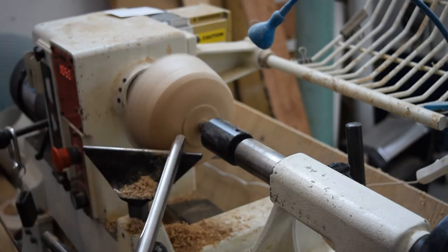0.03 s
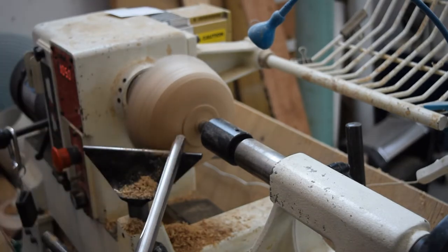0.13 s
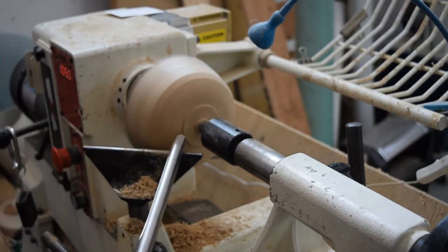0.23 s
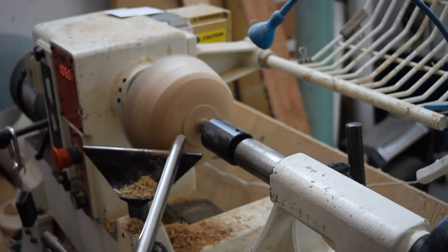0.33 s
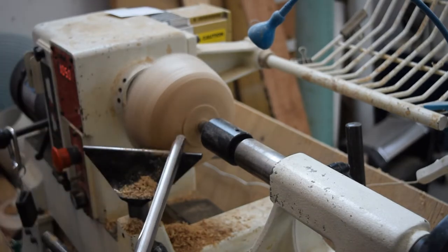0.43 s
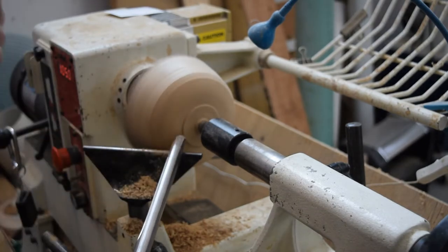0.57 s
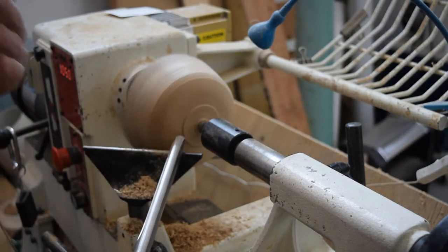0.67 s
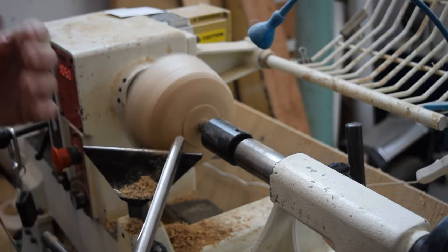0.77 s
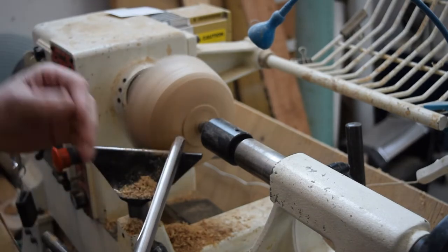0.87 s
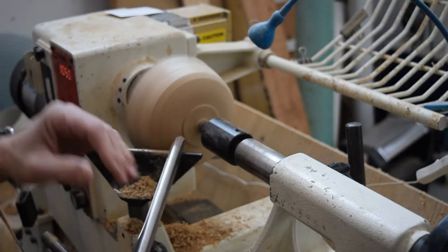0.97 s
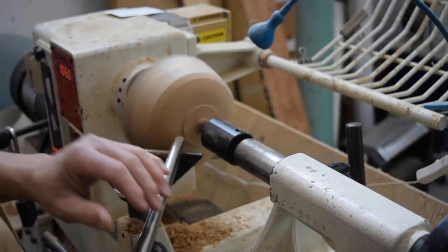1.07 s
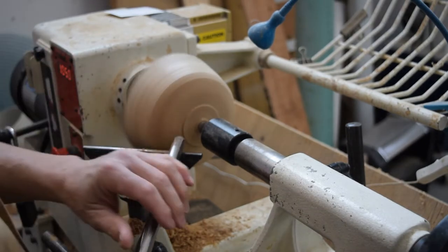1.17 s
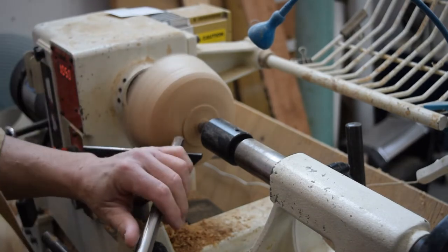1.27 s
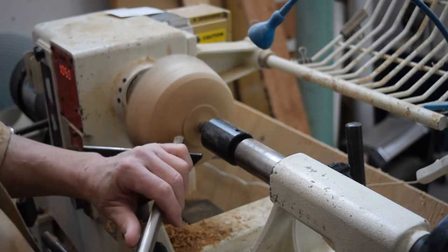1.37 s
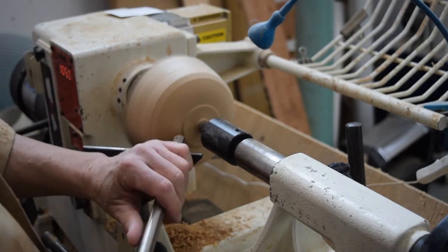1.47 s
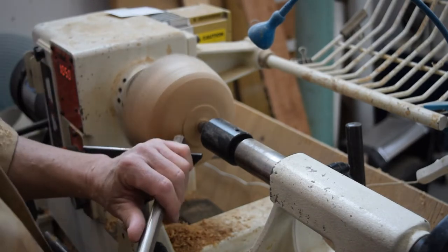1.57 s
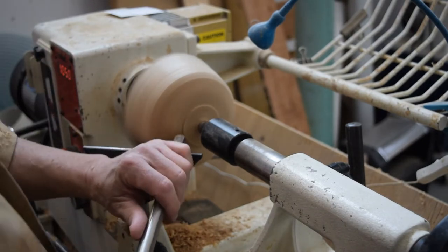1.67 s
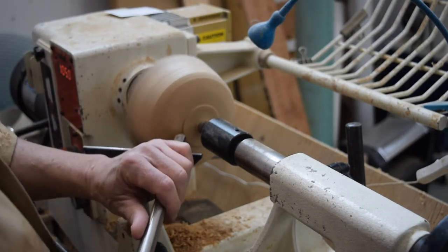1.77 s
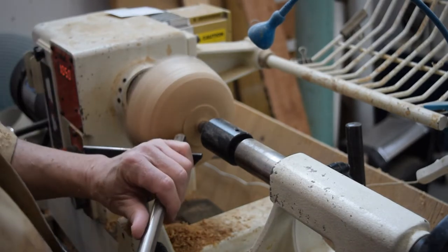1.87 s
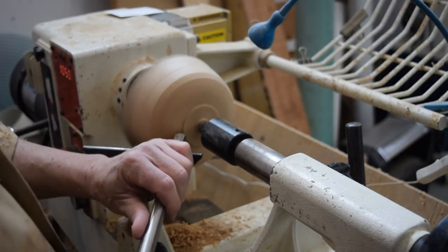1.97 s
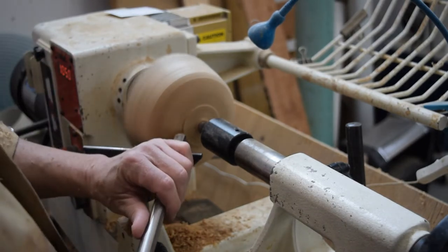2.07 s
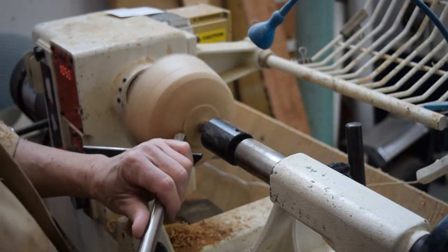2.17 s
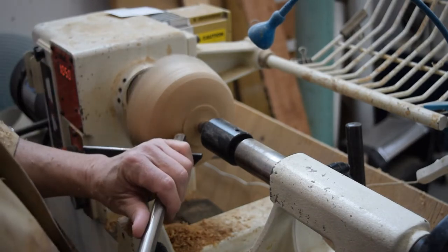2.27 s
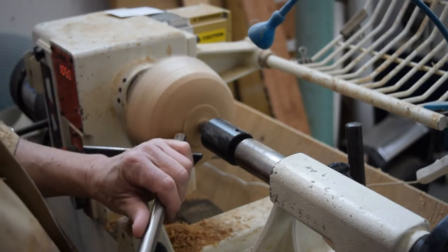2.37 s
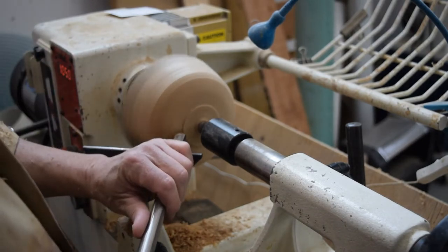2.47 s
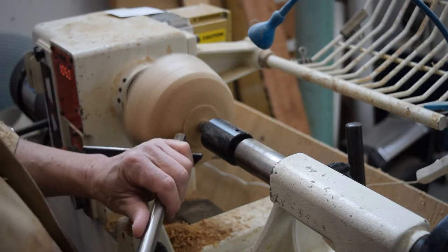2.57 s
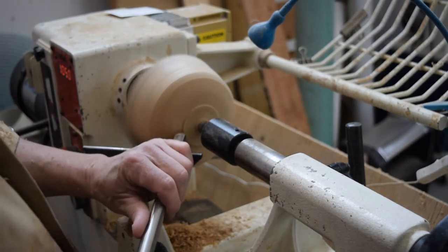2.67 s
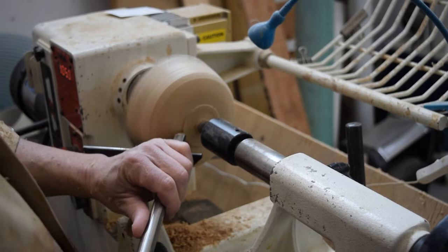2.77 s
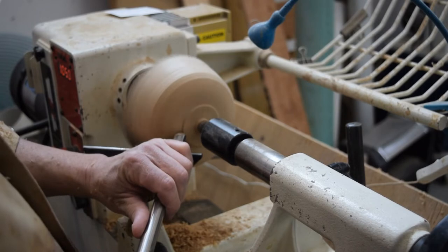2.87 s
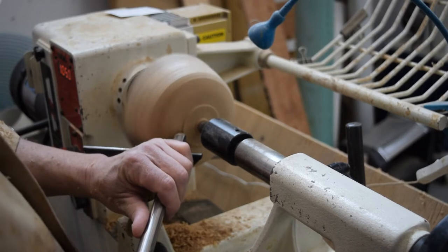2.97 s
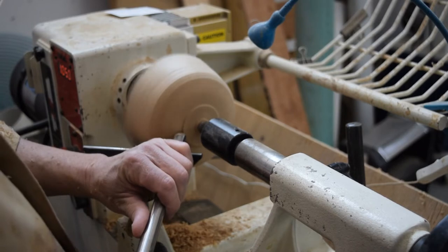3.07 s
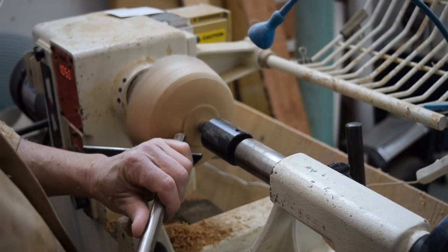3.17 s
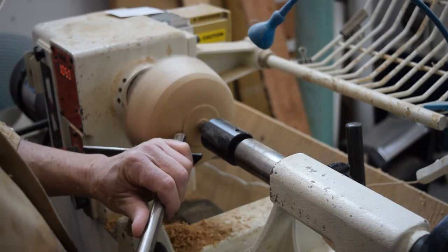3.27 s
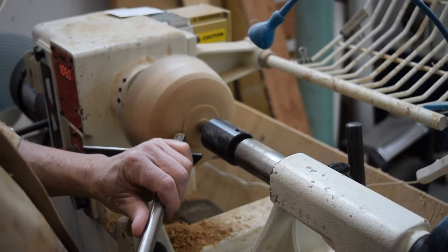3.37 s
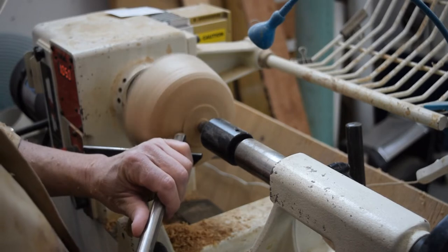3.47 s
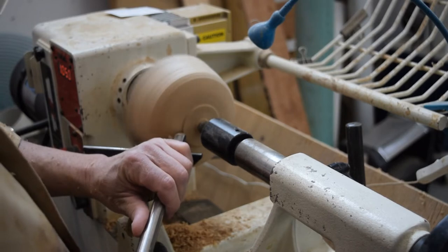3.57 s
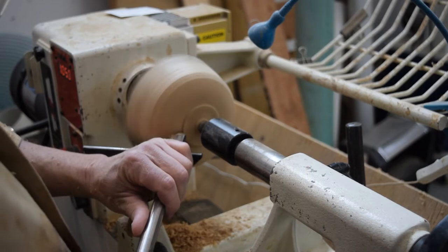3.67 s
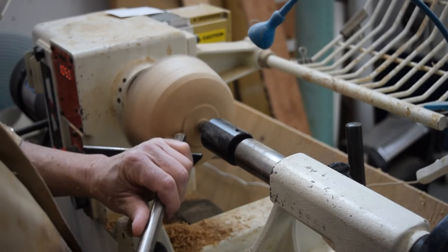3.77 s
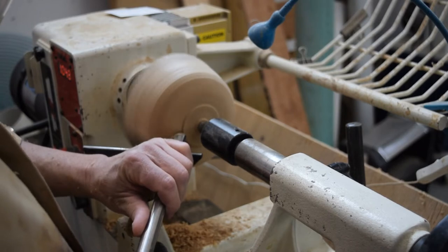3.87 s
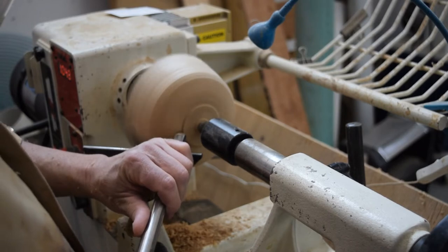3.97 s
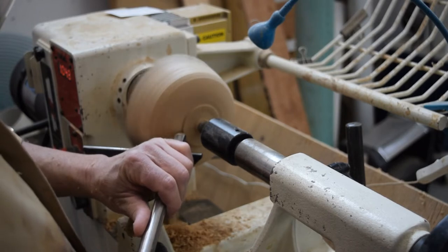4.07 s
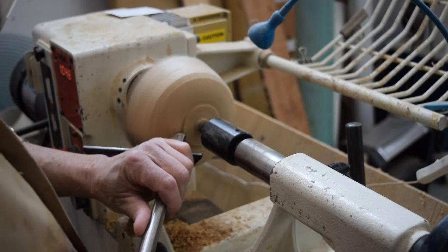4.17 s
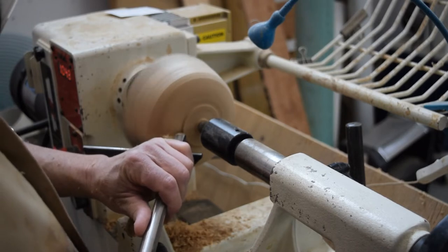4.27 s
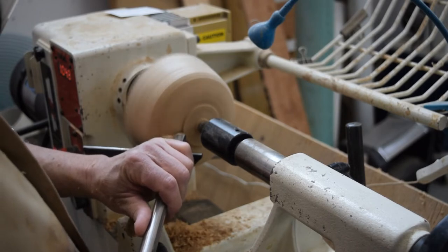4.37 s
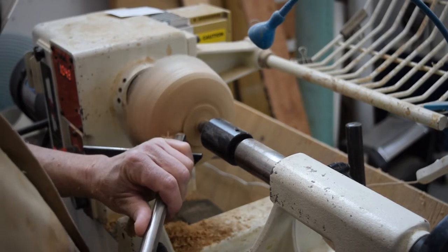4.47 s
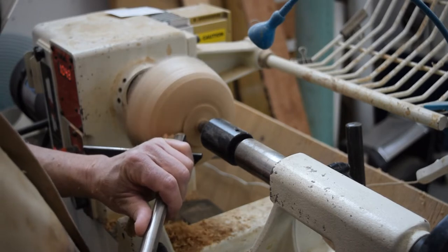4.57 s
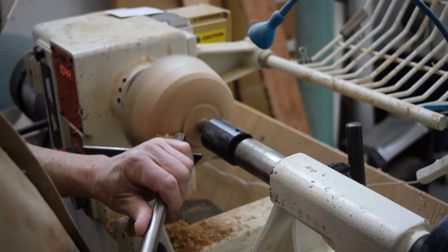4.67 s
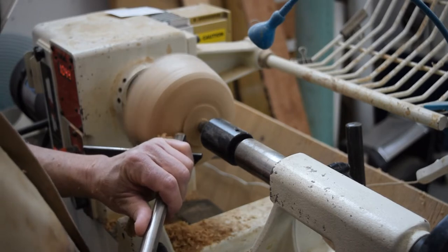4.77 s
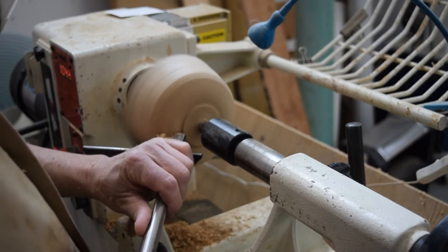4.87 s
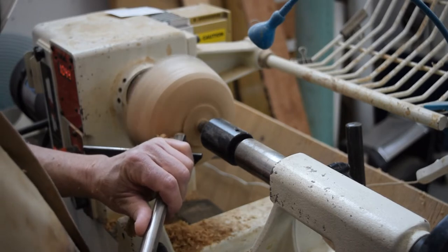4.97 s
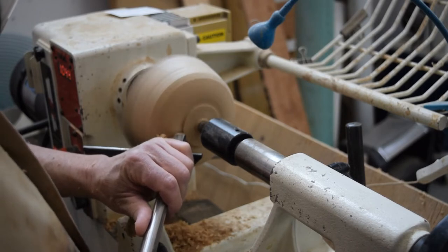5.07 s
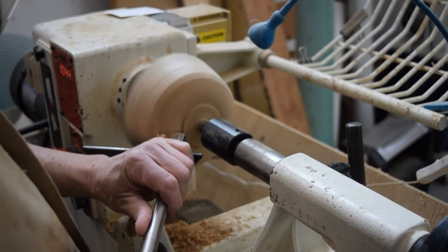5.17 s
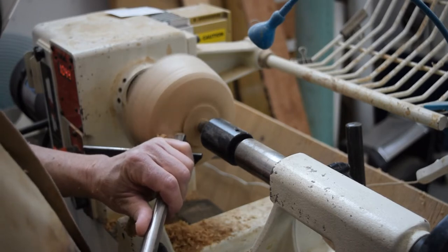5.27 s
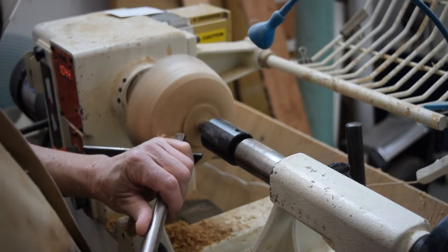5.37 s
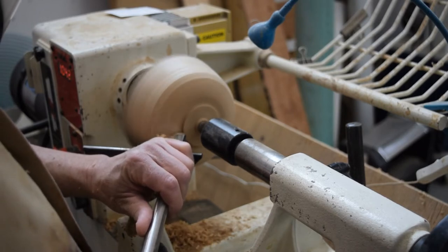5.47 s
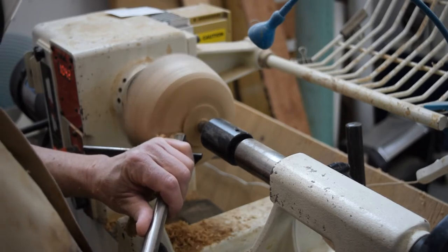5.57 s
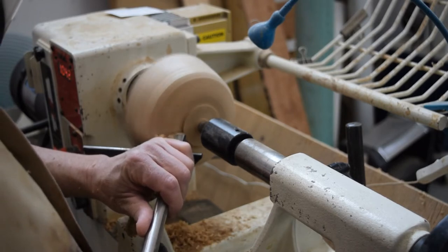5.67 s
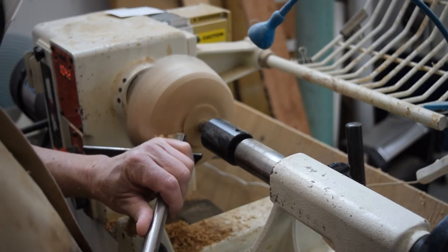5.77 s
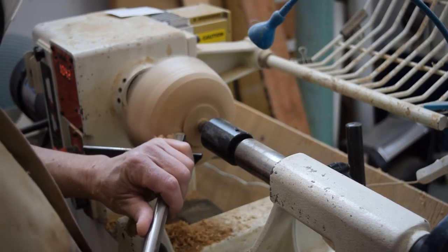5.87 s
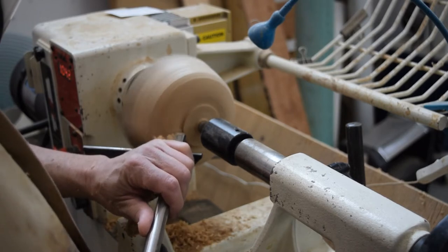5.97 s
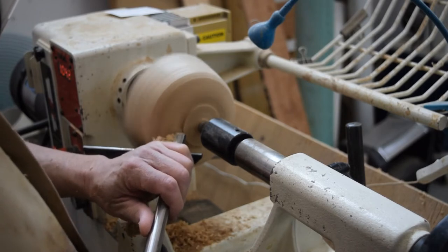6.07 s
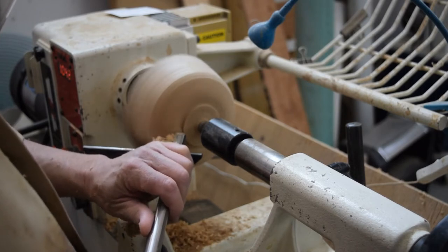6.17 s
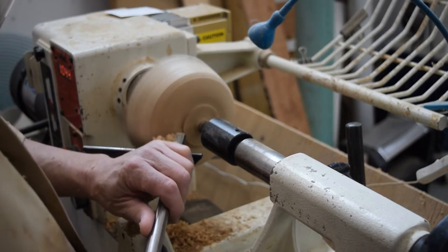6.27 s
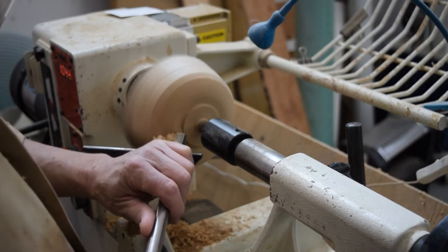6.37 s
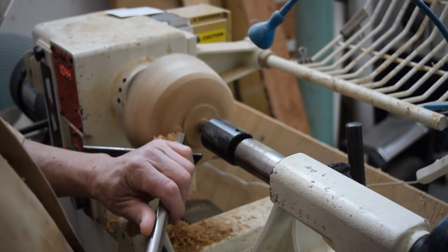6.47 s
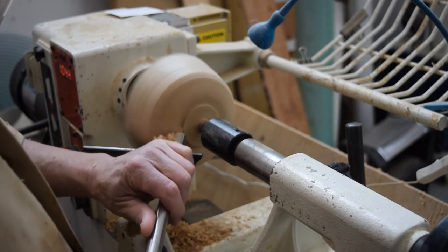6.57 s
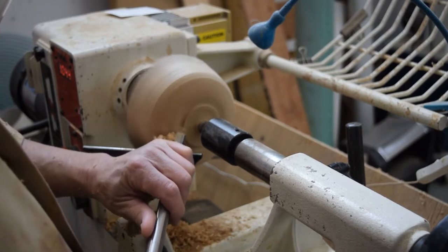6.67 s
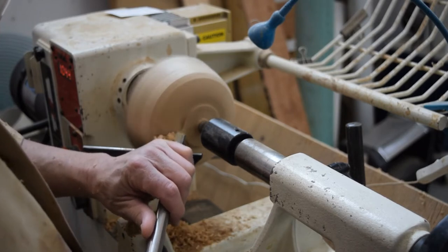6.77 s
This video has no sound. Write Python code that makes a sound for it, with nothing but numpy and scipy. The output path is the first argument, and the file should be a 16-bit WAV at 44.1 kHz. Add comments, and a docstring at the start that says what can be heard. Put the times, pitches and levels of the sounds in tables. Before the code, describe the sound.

A wood lathe hums with a thin high whistle, then a gouge bites the spinning bowl with a loud, rough, rapidly pulsing scrape.

```python
"""In a workshop a wood lathe idles: motor orders hum over belt and fan noise and a thin inverter whistle.
A gouge then meets the spinning dry bowl. Its edge rides nearly the same ridges on every turn and bites
hardest on two end-grain faces; that relief drives filters for the bed, the bowl and the steel.
Spindle orders thrum, chatter and narrow modes ring, shavings hiss, and short reflections surround it."""
import sys
import numpy as np
from scipy import signal
from scipy.fft import irfft, next_fast_len
from scipy.io import wavfile
from scipy.ndimage import uniform_filter1d

SR = 44100
rng = np.random.default_rng(int(sys.argv[2]) if len(sys.argv) > 2 else 0)


def generate_wav(sig):
    """Save sig (samples, or channels by samples) to the path in sys.argv[1] as 16-bit PCM at SR."""
    pcm = np.round(np.clip(np.atleast_2d(sig).T, -1, 1) * 32767).astype(np.int16)
    wavfile.write(sys.argv[1], SR, pcm)


N = 300762
T = np.arange(N) / SR  # s


def amp(db):
    """Amplitude factor of a level in dB."""
    return 10 ** (np.asarray(db) / 20)


def evened(x):
    """Scale to rms 1."""
    return x / np.sqrt(np.mean(x ** 2) + 1e-20)


def read(points, hz):
    """Interpolate a (Hz, value) table on a log frequency axis."""
    f, value = np.transpose(points)
    return np.interp(np.log(hz + 1), np.log(f + 1), value)


def columns(rows):
    """One curve over time for each column after the seconds."""
    s, *values = np.transpose(rows)
    return [np.interp(T, s, v) for v in values]


def colour(x, gain):
    """Causal minimum-phase filter whose magnitude is the function gain(hz)."""
    log_gain = np.log(gain(abs(np.fft.fftfreq(8192, 1 / SR))) + 1e-5)
    spectrum = np.exp(np.conj(signal.hilbert(log_gain)))
    taps = np.fft.ifft(spectrum).real[:4096]
    return signal.oaconvolve(x, taps)[:N]


def resonate(x, hz, width_hz):
    """A resonance of gain 1 that follows the curve hz: shift to 0 Hz, smooth, shift back."""
    turn = np.exp(2j * np.pi * np.cumsum(hz) / SR)
    r = np.exp(-np.pi * width_hz / SR)
    return 2 * (turn * signal.lfilter([1 - r], [1, -r], x / turn)).real


def tone(cycles, db, start=None):
    """Sine of rms level db; its start phase is random unless given in cycles."""
    start = rng.random() if start is None else start
    return np.sqrt(2) * amp(db) * np.sin(2 * np.pi * (cycles + start))


def waver(rate_hz):
    """Slow random drift of rms 1, from 12 sines between 1 Hz and rate_hz."""
    t = T[::200]
    slow = sum(np.sin(2 * np.pi * (f * t + rng.random())) / np.sqrt(f) for f in np.geomspace(1, rate_hz, 12))
    return np.interp(T, t, evened(slow))


def relief(turns, likeness, per_turn_hz, depth):
    """White roughness laid round a circle; a deeper shaving renews more of it on each turn."""
    size = 6000  # points a turn
    count = int(turns[-1]) + 2
    like = np.clip(likeness(np.arange(size // 6) * per_turn_hz), .01, .995)
    z = rng.standard_normal((count, size // 6, 2)) @ [1, 1j]  # one spectrum for each turn
    for k in range(1, count):
        keep = like ** np.interp(k, turns, depth)
        z[k] = keep * z[k - 1] + np.sqrt(1 - keep ** 2) * z[k]
    surface = irfft(z, size).ravel()
    return evened(np.interp(turns * size, np.arange(count * size), surface))


# Reflected share. Each row: frequency in Hz, level in dB.
WALLS_DB = [(100, -39), (300, -10), (600, -7.5), (1200, -13.5), (2500, -11.5), (5000, -20), (8000, -3.5),
            (11000, -10), (14000, -5)]
COMMON_REMOVED = .85  # share (0-1) of the reflections common to both channels that is taken out


def workshop(x):
    """Short sparse reflections, drawn separately for each channel, decaying 60 dB in 0.29 s."""
    at = np.arange(100, 9000, 20) + rng.integers(0, 20, (2, 445))
    taps = np.zeros((2, 9100))
    np.put_along_axis(taps, at, rng.choice([-1., 1.], at.shape) * amp(-60 * at / SR / 0.29), 1)
    taps -= COMMON_REMOVED * taps.mean(0)
    wet = colour(x, lambda hz: amp(read(WALLS_DB, hz)))
    return signal.oaconvolve(wet[None], taps / np.linalg.norm(taps[0]), axes=1)[:, :N]


# Whistle sidebands. Each row: multiple of the output frequency off the switching rate, level in dB,
# left minus right in dB.
SIDEBANDS = [(-29, -76, 0), (-23, -71, 0), (-17, -71, 0), (-15, -75, 0), (-11, -75, 0), (-9, -65, 3),
             (-5, -60, 9), (-3, -68, 0), (-1, -51.5, -5), (1, -55.5, -5), (3, -59, 10), (5, -62, 9),
             (11, -73, 0), (17, -74, 0), (23, -65.5, -2)]
SWITCH_HZ, DRIVE_HZ = 10000.7, 42.22  # switching rate, output frequency


def inverter():
    """Sidebands of the switching rate at multiples of the output frequency, some leaning to one side."""
    whistle = 0
    for k, db, lean_db in SIDEBANDS:
        sides = amp([[lean_db / 2], [-lean_db / 2]])
        whistle = whistle + sides * tone((SWITCH_HZ + k * DRIVE_HZ) * T, db + 0.5 * waver(7.2))
    return whistle


# Motor shaft speed. Each row: time in seconds, turns a second.
MOTOR_TURNS_PER_S = [(0, 21.095), (2.3, 21.095), (2.8, 21.06), (3.7, 21.05), (4.1, 21.02), (5.7, 21.02),
                     (5.95, 21.07), (6.82, 21.07)]
# Order 48, the slot whine, swells with load. Each row: time in seconds, level in dB before the jolts.
WHINE_DB = [(0, -37), (2.37, -42.5), (2.53, -38), (2.9, -32), (3.61, -31), (3.78, -39), (4.2, -30),
            (4.55, -42), (5.3, -32), (5.5, -36), (5.87, -31), (6.36, -38), (6.63, -31.5), (6.82, -33)]
# Other strong orders. Each row: multiple of the shaft speed, level in dB before the load swell.
ORDERS_DB = [(33, -62), (35, -45.5), (37, -55), (38, -55), (40, -56.5), (44, -57), (51, -57), (52, -61),
             (60, -56), (62, -57), (66, -58), (71, -58), (74, -43)]
# Faint tones, likely bearings and fan. Each row: frequency in Hz, mean level in dB.
BEARINGS_DB = [(1970, -64), (2067, -64), (2207, -67), (2304, -60), (2460, -66), (2643, -66), (2955, -78),
               (3052, -62), (3435, -72), (4856, -75), (5464, -73), (5970, -74)]
# Spectrum shape of belt, bearing and fan noise. Each row: frequency in Hz, relative level in dB per Hz.
IDLE_SHAPE_DB = [(25, -54), (70, -43), (125, -28), (225, -27.5), (300, -21.5), (340, -21.5), (390, -15.5),
                 (450, -22), (560, -24), (660, -25), (740, -17), (880, -17), (1010, -12), (1180, -20.5),
                 (1600, -22), (2300, -25), (2820, -29), (3100, -28.5), (3700, -32.5), (4500, -36),
                 (4950, -33.5), (5500, -37.5), (8600, -41), (10000, -27), (11200, -41), (13000, -64),
                 (15000, -64)]
IDLE_DB, RIPPLE_DB = -41.5, -44.5  # level of that noise, and of the part that repeats with the shaft
# Pressure of gouge on wood. Each row: time in seconds, level in dB re the full cut.
PRESSURE_DB = [(2.3, -30), (2.36, -27.5), (2.42, -16), (2.7, -13), (2.9, -8), (3.35, -8.5), (3.65, -5),
               (4.1, -1.5), (4.4, -1), (4.55, 1.5), (4.7, 0.5), (5.1, -0.5), (5.75, -1.5), (5.92, -8.5),
               (6.0, -10), (6.3, -12.5), (6.72, -12.5), (6.82, -8)]


def motor():
    """Shaft orders that wander in level and phase, over a bed of belt, bearing and fan noise."""
    turns = np.cumsum(columns(MOTOR_TURNS_PER_S)[0]) / SR
    whine_db = columns(WHINE_DB)[0]
    load_db = .4 * np.maximum(whine_db + 41, 0)  # the other orders share part of the swell
    # a heavy cut jolts the motor and breaks up the whine
    shake = amp(3.9 * np.minimum(columns(PRESSURE_DB)[0], 0))
    hum = tone(48 * turns + .22 * shake * waver(30.), whine_db + shake * (4 * waver(25.) - 3.5), 0)
    # the speed flutters once a turn: orders 47 and 49 stand in opposite phase round the whine
    hum += tone(47 * turns + .03 * waver(8.), -43 + 1.3 * waver(9.), 0)
    hum -= tone(49 * turns + .08 + .03 * waver(8.), -51 + 1.5 * waver(9.), 0)
    for k, db in ORDERS_DB:
        hum = hum + tone(k * turns + .06 * waver(6.), db + load_db + .9 * waver(7.))
    for hz, db in BEARINGS_DB:
        hum = hum + tone(hz * T + 0.047 * waver(2.9), db + 1.1 * waver(8.4))
    ripple = relief(turns, lambda hz: 1.3 / (1 + (hz / 2500) ** 2), MOTOR_TURNS_PER_S[0][1], np.ones(N))
    noise = amp(IDLE_DB) * rng.standard_normal(N) + amp(RIPPLE_DB) * ripple
    mean_gain = np.sqrt(np.mean(amp(read(IDLE_SHAPE_DB, np.linspace(0, SR / 2, 4000))) ** 2))
    return hum, colour(noise, lambda hz: amp(read(IDLE_SHAPE_DB, hz)) / mean_gain)


# Spindle orders that meet a resonance of the stand. Key: order. Each row: time in seconds,
# level in dB before the throb.
THRUM_DB = {7: [(2.3, -80), (2.6, -61), (2.9, -65), (3.7, -79), (4.3, -57), (4.76, -75), (5.05, -54.5),
            (5.6, -48), (6.45, -51), (6.82, -62)], 17: [(2.3, -78), (2.38, -34.5), (3.0, -34), (3.8, -38.5),
            (4.09, -44), (4.3, -34), (4.54, -31), (4.69, -37), (4.95, -30.5), (5.1, -34.5), (5.6, -28.5),
            (6.05, -45), (6.25, -46), (6.44, -35), (6.6, -73), (6.82, -32)], 18: [(2.3, -70), (2.55, -52),
            (3.0, -59), (4.0, -38), (4.3, -37), (4.7, -31), (5.1, -31.5), (5.4, -43), (6.0, -42),
            (6.82, -56)], 20: [(2.3, -70), (2.5, -44), (2.9, -39), (3.3, -38.5), (4.0, -44), (4.3, -44),
            (4.7, -39), (5.0, -49), (5.4, -35), (5.7, -36), (6.05, -41), (6.82, -50)], 23: [(2.3, -70),
            (2.4, -45), (2.95, -41), (3.3, -53), (3.95, -44), (4.3, -40), (4.7, -35), (5.0, -52),
            (5.4, -47), (5.75, -45), (6.05, -60), (6.5, -44), (6.82, -46)], 21: [(2.3, -69), (2.38, -45),
            (2.7, -39), (2.91, -34.5), (3.4, -30), (3.8, -30.5), (4.21, -23), (4.35, -24.5), (4.8, -25),
            (4.97, -38), (5.07, -24), (5.35, -19.5), (5.6, -25), (5.82, -35), (5.9, -53), (6.34, -45),
            (6.5, -32), (6.63, -38.5), (6.82, -32.5)]}
# Throb as the bowl runs out of round. Each row: time in seconds, depth once a turn, depth twice a turn.
THROB_DEPTH = [(2.4, -0.066, 0.1), (3.2, -0.22, 0.12), (3.7, 0.06, 0.08), (4.2, .04, 0.08),
               (4.5, 0.35, 0.13), (5., 0.44, 0.15), (5.7, 0.16, 0.15), (6.1, 0.022, .25),
               (6.82, 0.18, 0.27)]


def stand_thrum(turns):
    """Spindle orders through the stand, throbbing once and twice a turn."""
    thrum = sum(tone(k * turns, columns(level)[0]) for k, level in THRUM_DB.items())
    once, twice = columns(THROB_DEPTH)
    angle = 2 * np.pi * (turns - .84)
    return thrum * (1 + once * np.cos(angle) + twice * np.cos(2 * angle))


SPRAY_DB, SPRAY_HZ = -44, 11500.  # level at the full cut, lower edge


def shavings(pressure_db):
    """Hiss of flying shavings: band-passed noise that follows the pressure."""
    def band(hz):
        return 1 / np.sqrt(1 + (SPRAY_HZ / (hz + 1)) ** 12) / (1 + (hz / 12000.0) ** 12)
    return amp(SPRAY_DB + 1.1 * pressure_db) * evened(colour(rng.standard_normal(N), band))


def strokes(db, size=400):
    """Random gain of db rms that differs from one stroke of end grain to the next."""
    smooth = uniform_filter1d(uniform_filter1d(rng.standard_normal(N), size), size)
    return amp(db * evened(smooth))


# Spindle speed, sagging as the belt is loaded. Each row: time in seconds, turns a second.
SPINDLE_TURNS_PER_S = [(0, 17.79), (2.3, 17.79), (3.2, 17.76), (3.5, 17.69), (4, 17.655), (4.7, 17.67),
                       (5.2, 17.64), (5.6, 17.6), (5.9, 17.75), (6.3, 17.83), (6.82, 17.8)]
CHIP_DB, CHIP_MEMORY = -5., 0.938  # level at the full cut; likeness a turn (0-1) at shaving depth 1


def chips(turns, depth):
    """Sharp snaps at the hardest spots of the surface, which return for a few turns."""
    return evened(relief(turns, lambda hz: CHIP_MEMORY + 0 * hz, SPINDLE_TURNS_PER_S[0][1], depth) ** 3)


def chatter(wood, hz, width_hz):
    """The edge locks to one mode: an even vibration whose phase is led by the ridges left on the wood."""
    mode_hz = hz * np.ones(N)
    ring = resonate(resonate(wood, mode_hz, width_hz), mode_hz, width_hz)
    ring = signal.hilbert(ring, next_fast_len(N))[:N]
    return evened((ring / (abs(ring) + 1e-9) ** 1.02).real)


# Narrow rings of bowl and gouge. Key: frequency in Hz, width in Hz, pulsing with the bite (exponent).
# Each row: time in seconds, level in dB, played 6.5 dB lower and pulsing with the bite.
RINGS_DB = {(548, 18, .12): [(2.4, -71), (3.16, -33.5), (3.64, -44), (4.04, -27), (5.0, -32), (5.37, -64),
            (5.92, -34.5), (6.66, -50), (6.82, -45)], (741, 18, .12): [(2.4, -53), (2.99, -63), (3.73, -35),
            (4.47, -19), (4.65, -31), (4.95, -21), (5.02, -37), (5.8, -22.5), (6.02, -48), (6.19, -25),
            (6.24, -46), (6.82, -41)], (1230, 90, .3): [(2.4, -49), (2.6, -63), (3.27, -41), (3.59, -23.5),
            (4.42, -43), (4.57, -28), (4.7, -35), (5.08, -42), (5.61, -39), (6.25, -62), (6.82, -52)],
            (1320, 70, .35): [(2.4, -60), (2.94, -37), (3.22, -31), (3.67, -33), (4.49, -48), (4.53, -24),
            (5.11, -41), (5.42, -16), (5.64, -40), (5.83, -24), (5.93, -33), (6.82, -36)],
            (1495, 60, .4): [(2.4, -54), (2.42, -42), (2.67, -54), (2.85, -31), (3.22, -31), (4.43, -43),
            (4.53, -19), (4.82, -17), (4.87, -27), (5.12, -16.5), (5.71, -20), (5.99, -30.5), (6.73, -46),
            (6.82, -32)], (1618, 30, .12): [(2.4, -69), (2.89, -24), (3.46, -45), (4.11, -18.5),
            (4.23, -34), (4.43, -17), (4.89, -23), (5.03, -14.5), (5.23, -34), (5.69, -19.5), (6.38, -44),
            (6.82, -31)], (1725, 60, .5): [(2.4, -64), (4.85, -41), (4.98, -25), (5.12, -25), (5.25, -42),
            (6.82, -60)], (6950, 120, .3): [(2.4, -62), (2.41, -60), (3.03, -58), (4.78, -29), (4.95, -41),
            (5.76, -35), (6.02, -48), (6.78, -37), (6.82, -41)]}


def singing(wood, bite, turns):
    """Narrow modes of bowl and gouge that come and go, pulsing with the bite and once a turn."""
    once = 1 + 0.19 * np.cos(2 * np.pi * (turns - .55))
    total = 0
    for (hz, width_hz, pulse), level in RINGS_DB.items():
        total = total + amp(columns(level)[0] - 6.5) * chatter(wood, hz, width_hz) * bite ** pulse * once
    return total


def modes(table):
    """Magnitude of a set of resonances, closed off below the first and above the last."""
    def gain(hz):
        power = sum(amp(db) ** 2 / (1 + (2 * (hz - f) / w) ** 2) for f, w, db in table)
        below = 1 + (1.064 * table[0][0] / (hz + 1)) ** 12
        above = 1 + (hz / 0.96 / table[-1][0]) ** 14
        return np.sqrt(power / below / above)
    return gain


# Steel modes, one list each for tool rest, gouge shaft, flute, cutting edge.
# Each row: frequency in Hz, width in Hz, relative level in dB.
STEEL_MODES = ([(2970, 94, -1.5), (3154, 120, 1), (3390, 100, -1)], [(3700, 91, -1.5), (4300, 340, -4),
               (4700, 860, -10)], [(5590, 210, 0.5), (5900, 210, -2.5), (6296, 68, 1), (6820, 170, -1)],
               [(7200, 160, 0.5), (7850, 280, 1), (8810, 260, -1), (9550, 250, -5), (10700, 660, -7),
               (12950, 340, -9.5), (14000, 550, -10.5)])
# Upper shaft mode, moved by the grip of the hand. Each row: time in seconds, frequency in Hz,
# level in dB re the other shaft modes.
GRIP_MODE_HZ_DB = [(2.3, 4460, -7), (3.2, 4400, -26), (4, 4650, -3), (4.6, 4600, -4), (5.3, 4620, -3),
                   (5.9, 4490, -10), (6.3, 4320, 1), (6.82, 4450, -14)]
# Main shaft mode, stiffened or freed by the grip. Each row: time in seconds, frequency in Hz.
SHAFT_MODE_HZ = [(2.4, 4100), (3.02, 4009), (5.32, 4070), (6.8, 4130)]
# Excess of chatter on the first face over the opposite side. Each row: time in seconds,
# tool rest in dB, shaft in dB.
FAVOUR_DB = [(2.4, -1.5, -9), (2.8, 8, 2.5), (3.05, 17, -6.5), (3.3, 9, -1), (3.5, 8, -4), (3.65, -2, -1),
             (4.3, -5, 2.5), (4.7, -4, 3), (5.2, -12, -2), (5.7, 9, 15), (6.1, -6, -15), (6.3, 0, 0),
             (6.6, 3, 0), (6.82, -8, 5)]
REST_PING_HZ, PING_WIDTHS_HZ = 3150, (100, 90)  # rest mode; widths for rest and shaft, each pass


def steel_parts(wood, torn, bite, turns, chatter_db):
    """Tool rest, shaft, flute and edge ring with the torn wood; rest and shaft also chatter."""
    sharpness = (0.23, 0.39, 0.38, 0.71)  # how sharply each part follows the bite
    parts = [evened(colour(torn * bite ** g * strokes(1.22), modes(m)))
             for g, m in zip(sharpness, STEEL_MODES)]
    grip_hz, grip_db = columns(GRIP_MODE_HZ_DB)
    upper = resonate(resonate(torn * bite ** .55, grip_hz, 230.0), grip_hz, 230.0)
    parts[1] = parts[1] + amp(grip_db) * evened(upper)
    shaft_hz = columns(SHAFT_MODE_HZ)[0]
    main = resonate(torn * bite ** .5, shaft_hz, 84.0)
    parts[1] = evened(parts[1] + amp(-9.0) * evened(main))
    favour_db = columns(FAVOUR_DB)
    for k, (hz, width_hz) in enumerate(zip((REST_PING_HZ, shaft_hz), PING_WIDTHS_HZ)):
        ping = chatter(wood, hz * (1 + 0.0018 * waver(4.)), width_hz)
        ping = ping * bite ** 1.22 * strokes(1.7)
        ping = ping * amp(favour_db[k] / 2 * np.cos(2 * np.pi * turns))
        ping = amp(chatter_db + 0.5) * evened(ping)
        # chatter takes a share of the part's vibration
        parts[k] = (parts[k] + ping) / np.sqrt(1 + amp(chatter_db) ** 2)
    return parts


# Meeting of second face and edge. Each row: time in seconds, share of a turn.
SECOND_FACE_TURN = [(2.4, 0.63), (2.9, 0.49), (3.6, 0.55), (4.1, 0.42), (5.4, 0.47), (5.8, 0.38),
                    (6.82, 0.55)]


def end_grain_bite(turns, first, steady, narrow):
    """Power of the cut: a steady part plus two end-grain passes a turn, evened over about one turn."""
    face = [np.exp(narrow * (np.cos(2 * np.pi * (turns - side)) - 1))
            for side in (0, columns(SECOND_FACE_TURN)[0])]
    bite = steady + 4 * (1 - steady) * (first * face[0] + (1 - first) * face[1])
    bite /= uniform_filter1d(bite, 2490)
    return bite * strokes(1.34)


# How the edge sits in the wood. Each row: time in seconds, share of the bite on the first face (0-1),
# steady cut between faces (0-1), narrowness of the biting arc, chatter in dB re the torn vibration.
EDGE_CONTACT = [(2.3, 0.96, 0.04, 3.5, -2), (2.55, 0.91, 0.18, 6.5, 1), (2.72, 0.91, 0.3, 5.2, 0),
                (3.05, 0.27, 0.36, 6.2, -0.5), (3.3, 0.61, 0.38, 13, -1), (3.7, 0.47, 0.32, 7.2, -2),
                (4.2, 0.51, 0.41, 7.8, -3), (4.55, 0.51, 0.27, 9.6, -5), (4.9, 0.37, 0.29, 5.3, -4.5),
                (5.3, 0.58, 0.36, 8.6, -9.5), (6.05, 0.39, 0.24, 12, -6), (6.25, 0.45, 0.32, 7, -10),
                (6.6, 0.43, 0.34, 9.7, -6), (6.82, 0.39, 0.18, 5.1, -2.5)]
# Likeness of the surface from turn to turn at shaving depth 1. Each row: frequency in Hz, likeness (0-1).
RIDGE_MEMORY = [(300, 0.91), (1000, 0.89), (2000, 0.88), (3200, 0.85), (4200, 0.73), (7000, 0.56),
                (12000, 0.4)]
# Spectrum shapes of bed and bowl. Each row: frequency in Hz, relative level in dB per Hz.
BED_SHAPE_DB = [(25, -37), (90, -41.5), (200, -23.5), (270, -16.5), (320, -7.5), (370, -5), (410, -8.5),
                (450, -11), (560, -14), (630, -18.5), (730, -20), (950, -13.5), (1300, -13), (2600, -88)]
BOWL_SHAPE_DB = [(350, -67), (650, -9.5), (740, -9), (950, -4), (1500, -2.5), (2150, -4.5), (2400, -7),
                 (2750, -16), (3300, -18), (6000, -101)]
# Bed, bowl, tool rest, gouge shaft, flute, cutting edge. Each row: level in dB at the full cut without
# chatter (the steel swells besides), dB gained per dB of pressure, dB gained in full chatter.
FOLLOW_DB = [(-24.5, 0.66, -4.5), (-18.5, 0.89, -1.75), (-22.5, 1.23, 2.8), (-23, 1.09, 5),
             (-29.5, 1.0, -1.5), (-32, 1.26, -2.)]
# Swells of the steel during the cut. Each row: time in seconds, gain in dB for tool rest, shaft, flute
# and edge, added to the level that follows the pressure.
STEEL_SWELL_DB = [(2.4, 2.5, 3.5, -1.5, 3), (2.85, -2.5, 3, -0.5, 2), (3.15, 0.5, 5, 2, 1.3),
                  (3.45, -2, 4, 0, 1.5), (3.75, 0.5, 2, 4, 2), (4.2, -4, 0.6, 1.5, .1),
                  (4.7, -2.7, -1, 0.3, -2.7), (5.2, -1.3, 1.5, 0.7, 0.5), (5.6, -1.2, 0.5, 1.5, -3),
                  (5.9, 0, 3, 0.5, 3.5), (6.2, 1, 2.2, 1, 4.5), (6.5, 0.5, 3.8, 0.5, 5),
                  (6.82, 1.5, 4, 2.5, 5.5)]
DEPTH_FULL, DEPTH_SLOPE = 1.73, 0.57  # shaving depth factor at the full cut, its dB per dB of pressure


def gouge():
    """The surface relief, gripped twice a turn, shakes bed, bowl and steel."""
    turns = np.cumsum(columns(SPINDLE_TURNS_PER_S)[0]) / SR
    pressure_db = columns(PRESSURE_DB)[0]
    first, steady, narrow, chatter_db = columns(EDGE_CONTACT)
    depth = DEPTH_FULL * amp(DEPTH_SLOPE * pressure_db)
    first, steady, depth = np.clip([first, steady, depth], .02, [[1], [1], [3]])
    bite = end_grain_bite(turns, first, steady, narrow)
    wood = relief(turns, lambda hz: read(RIDGE_MEMORY, hz), SPINDLE_TURNS_PER_S[0][1], depth)
    fibres = amp(1.9 * evened(uniform_filter1d(rng.standard_normal(N), 25)))  # fibres tear unevenly
    touch = np.clip((T - PRESSURE_DB[0][0]) / 0.015, 0, 1)
    share = 1 / (1 + amp(-2 * chatter_db))  # share of the vibration that is chatter
    bed_db, bowl_db, *steel_db = [db + slope * pressure_db + gain_db * share
                                  for db, slope, gain_db in FOLLOW_DB]
    bed = colour(wood * bite ** 0.073, lambda hz: amp(read(BED_SHAPE_DB, hz)))
    bowl = colour(wood * bite ** 0.27 * fibres, lambda hz: amp(read(BOWL_SHAPE_DB, hz)))
    snaps = amp(CHIP_DB + 0.29 * pressure_db) * chips(turns, depth) * bite ** 0.19
    torn = wood * fibres + snaps
    parts = steel_parts(wood, torn, bite, turns, chatter_db)
    swells_db = columns(STEEL_SWELL_DB)
    steel = sum(amp(db + swell_db) * part for db, swell_db, part in zip(steel_db, swells_db, parts))
    steel += singing(wood, bite, turns)
    steel += shavings(pressure_db)
    cut = amp(bed_db) * evened(bed) + amp(bowl_db) * evened(bowl) + steel
    return touch * stand_thrum(turns), touch * cut


# Balance of the direct sound. Each row: frequency in Hz, left minus right in dB.
LEAN_DB = [(60, 0), (200, -.6), (400, -.5), (740, 4.5), (1010, 7), (1560, 4.8), (2400, 4), (4400, 3),
           (8000, .8), (15000, 1.5)]


def scene():
    """Direct sound with a left-right lean by frequency, plus whistle and reflections."""
    hum, noise = motor()
    thrum, cut = gouge()
    hz = np.fft.rfftfreq(1024, 1 / SR)
    shadow = [np.roll(irfft(amp(side * read(LEAN_DB, hz))), 512) for side in (.5, -.5)]
    direct = [signal.oaconvolve(hum + noise + thrum + cut, s, "same") for s in shadow]
    return np.array(direct) + inverter() + workshop(noise + cut)


EDGE_HZ = 15690  # band limit


def record(dry):
    """Soft overload near full scale, then the band limit."""
    held = 1.253 * np.tanh(dry / 1.402)
    low_pass = signal.firwin(511, EDGE_HZ, window=("kaiser", 9), fs=SR)
    return np.clip(signal.oaconvolve(held, low_pass[None], "same"), -1, 1)


dry = scene()
out = record(dry)
generate_wav(out)
```